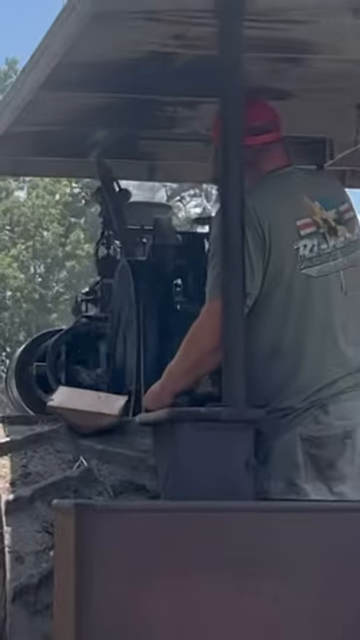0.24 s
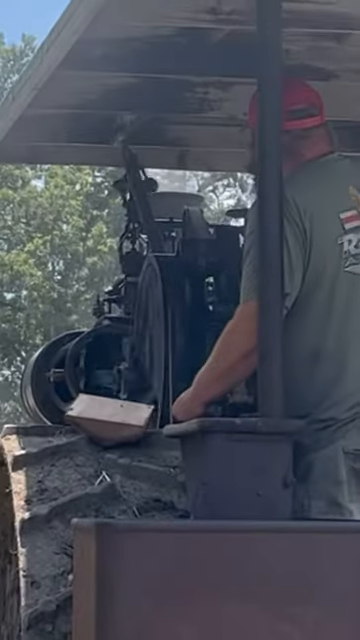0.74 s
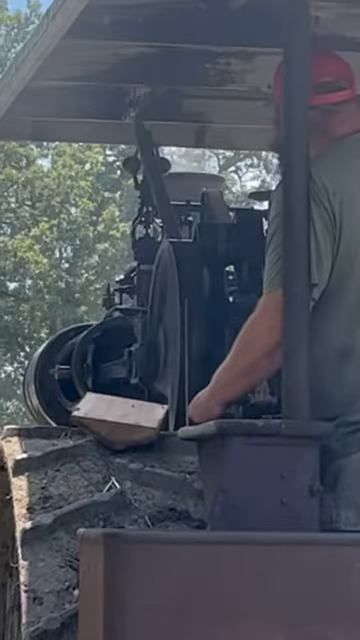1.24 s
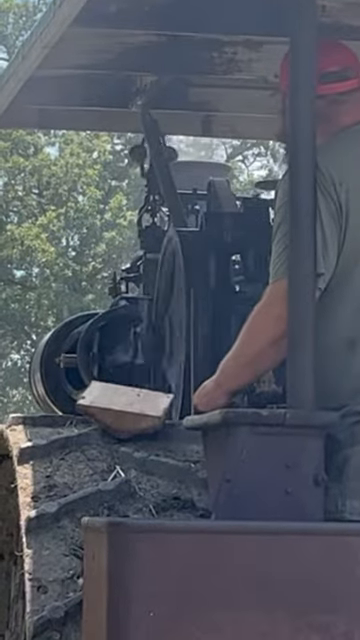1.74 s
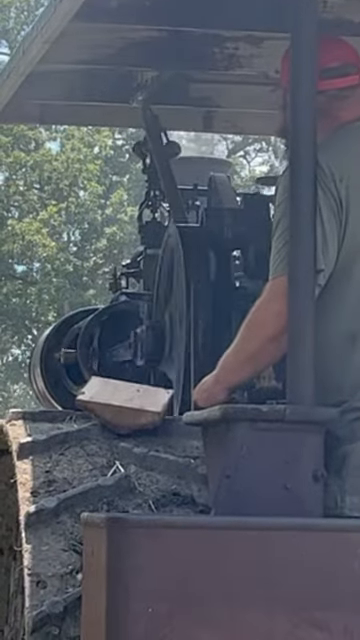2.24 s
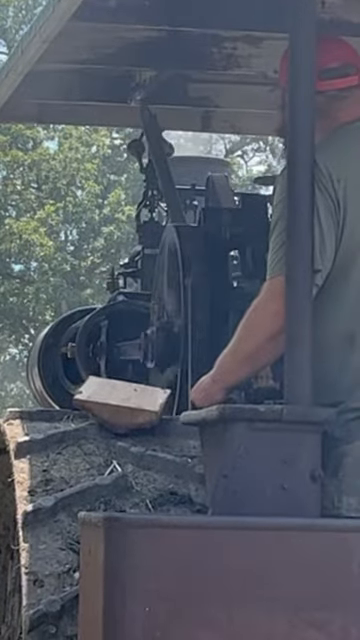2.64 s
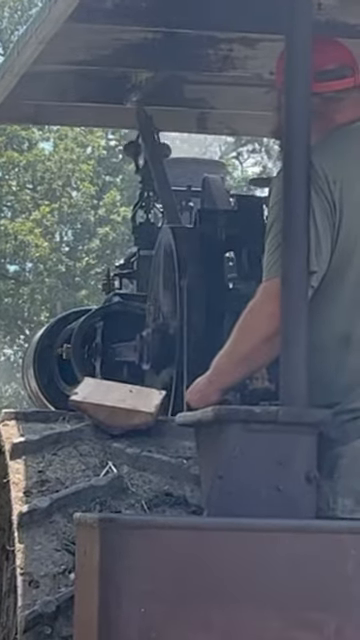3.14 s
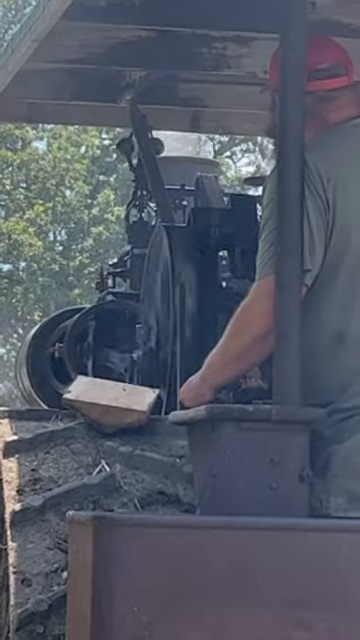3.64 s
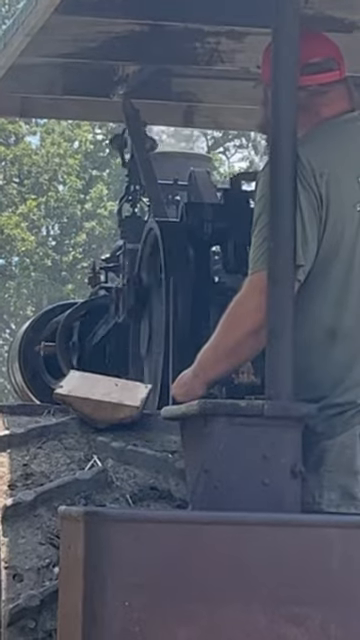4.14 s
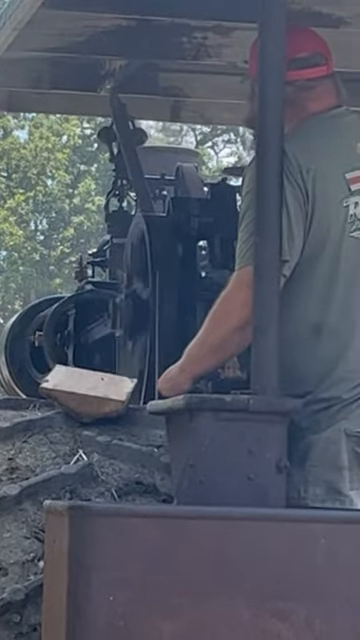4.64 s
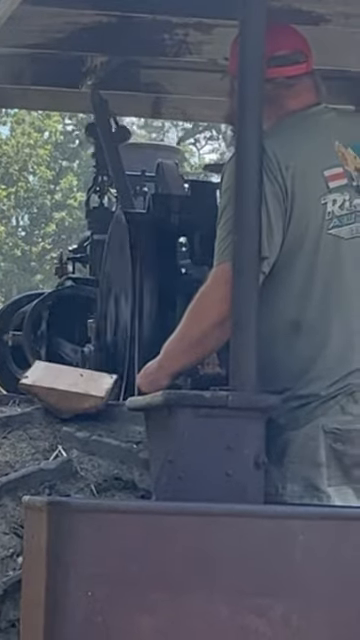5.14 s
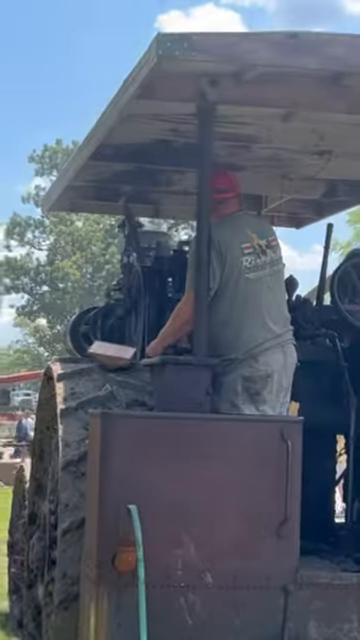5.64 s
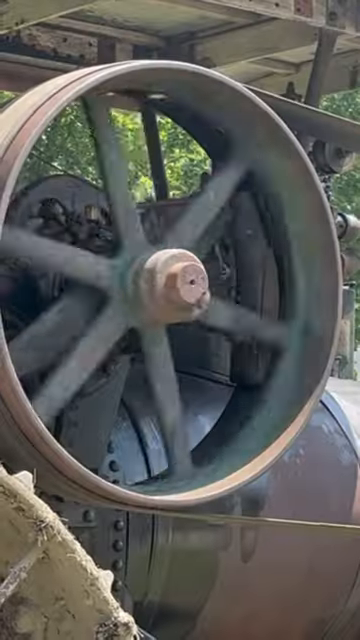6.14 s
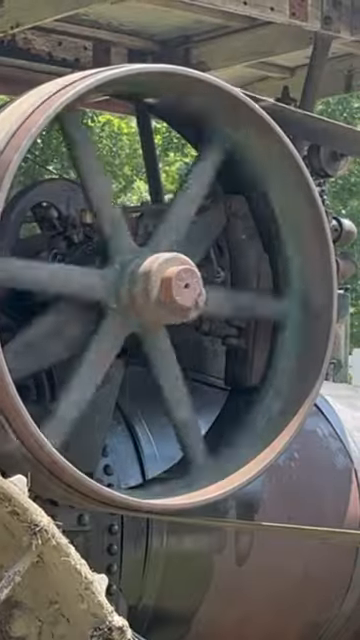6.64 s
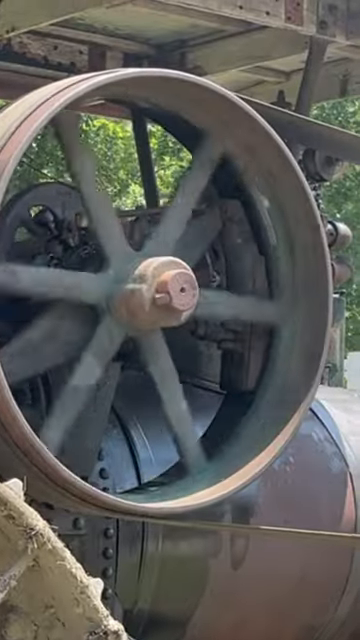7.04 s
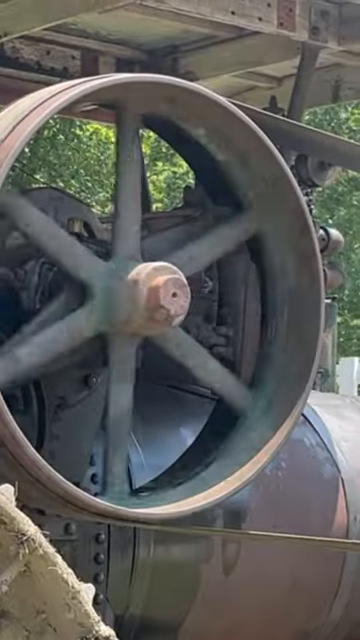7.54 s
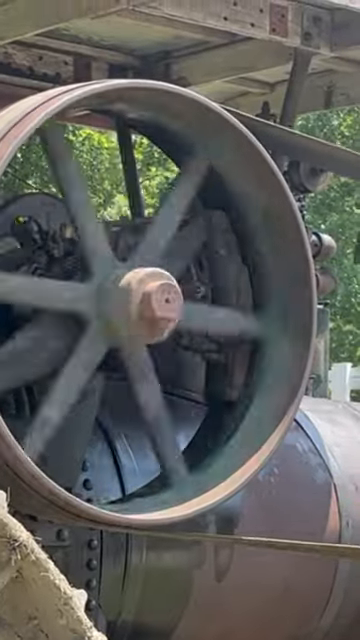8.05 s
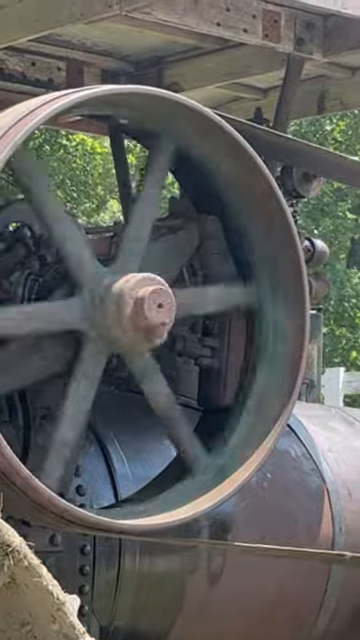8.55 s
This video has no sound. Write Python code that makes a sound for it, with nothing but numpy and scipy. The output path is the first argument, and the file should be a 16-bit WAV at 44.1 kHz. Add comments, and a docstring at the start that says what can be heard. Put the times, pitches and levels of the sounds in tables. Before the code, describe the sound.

Outdoors, behind the footplate of an old steam traction engine, hoarse hollow chuffs pound about eight times a second with deep thumps and stack hoots. Around four seconds the load drops: beats shrink to soft puffs over rumble, with valve ticks, bearing knocks and thin iron squeals. At six seconds an abrupt cut puts the microphone beside the flywheel, where louder, sharper chuffs spit steam to the end.

```python
"""A steam traction engine drives a sawmill by belt in the open air, two exhaust chuffs to each crank turn.
First, from behind the footplate, it works hard: noise jets, ringing stack tones and pitched hoots per beat.
From about 4 s it runs light: valve ticks, bearing knocks and ringing ironwork come through, as modal noise
and wavering tones. At 6.08 s the listener is abruptly beside the flywheel: loaded again, closer, sharper.
Gland leaks, rumble, fire boom and boiler hiss, all coloured noise, lie beneath."""
import sys
import numpy as np
from scipy import signal
from scipy.fft import rfft, irfft
from scipy.io import wavfile
from scipy.ndimage import uniform_filter1d

SR = 44100
rng = np.random.default_rng(int(sys.argv[2]) if len(sys.argv) > 2 else 0)


def to_wav(s):
    """Save 16-bit WAV."""
    ch = np.atleast_2d(s).T  # columns
    pcm = np.round(np.clip(ch, -1, 1) * 32767)  # PCM
    wavfile.write(sys.argv[1], SR, pcm.astype(np.int16))


N = 388080
TIME = np.arange(N) / SR
FREQS = np.fft.rfftfreq(N, 1 / SR)

MOVE_S = 6.083
WORKING_DB, LIGHT_DB = -8, -22  # blast when sawing (the other levels are given at it), and running light
LIGHT_RING_SHARE = 0.61  # the thump dies sooner when little steam follows it
BITE_HZ, BITE_OCTAVES = 1600, 1  # where a wetter, harder blast adds its bite
BARK_ALIKE = .4  # share of the power of the bark's grain that is the same on every beat
SIDE_TAIL_DB, SIDE_TAIL_S = -8, 0.045  # ragged steam trailing each beat beside the flywheel
TEETH_PER_TURN, CHATTER_DB = 8.1, 1  # the gears shake the ironwork
LOW_SING_HZ, HIGH_SING_HZ = 922, 1514  # clean tones of rubbing iron
SING_WAVER = .008  # rms share by which their pitch wanders
TICK_BOUNCE_S, TICK_BOUNCE_DB = .007, -13  # each tick snaps, then settles with a softer bounce
CUTOFF_HZ = 15700

# Exhaust beats, forward and back strokes in turn. Each row: start in seconds, blast in dB, deep thump in dB,
# stack note in dB, extra bite in dB, swell time as a multiple of the usual, throat pitch in Hz.
BEATS = [(0.043, -7.5, -20, -6.0, -2, 0.6, 835), (0.156, -12.5, -25, -11, -7, 1.0, 652),
         (0.286, -8.5, -25.5, -5, 0, 0.9, 694), (0.4, -15.5, -23, -6, 2.3, 1.1, 705),
         (0.531, -8, -21.0, -9.5, -1.5, 0.8, 833), (0.644, -12, -23.0, -17, -4, 0.7, 720),
         (0.775, -11, -23.0, -10.5, 0.5, 1.5, 620), (0.887, -14, -36.0, -10, -4, 1.1, 722),
         (1.017, -8.7, -22, -16, -0.5, 1.4, 650), (1.13, -13.7, -23.5, -12, -1, 1.1, 830),
         (1.26, -9.4, -20.5, -13, -3.5, 1.0, 704), (1.375, -13.5, -25.0, -16, -0.5, 0.7, 635),
         (1.505, -8.5, -24.5, -34, -1, 1.1, 730), (1.619, -12.5, -23, -13, -4, 0.6, 815),
         (1.754, -11, -21, -24, 2.5, 1.7, 625), (1.872, -10, -24.5, -8, -1.9, 0.8, 710),
         (2.005, -7.8, -29, -6, -2.5, 0.8, 735), (2.123, -10.5, -18, -14.0, -3, 1.0, 627),
         (2.259, -7, -26, -19, -0.8, 1.0, 856), (2.379, -10.5, -23, -8.5, 1, 1.0, 661),
         (2.517, -6, -23, -5.5, -1, 0.9, 694), (2.631, -7.5, -23, -6.5, 2.5, 1.8, 710),
         (2.768, -6, -23, -6.0, 3.5, 1.8, 780), (2.883, -8.5, -20.5, -10.0, -1, 1.3, 630),
         (3.017, -5.5, -29, -7, 0.5, 1.4, 793), (3.13, -9, -42, -14, 0, 0.8, 644),
         (3.263, -5, -27.5, -7, -0.5, 1.6, 728), (3.387, -6.5, -23, -14.0, -0.1, 0.7, 624),
         (3.506, -5, -29, -15, -2, 0.7, 770), (3.612, -11.5, -24.0, -13.0, 2.5, 1.8, 625),
         (3.733, -8, -40.0, -11.0, 0, 1.8, 648), (3.836, -12, -25, -15, -3, 0.6, 645),
         (3.954, -15, -22.0, -20, 2.5, 1, 720), (4.055, -25.5, -21.0, -26.0, 3, 1, 710),
         (4.167, -18.5, -25, -15.0, 5, 1, 730), (4.267, -33, -23.5, -23, 9, 1, 715),
         (4.381, -23, -32, -11.5, 5, 1, 720), (4.479, -24, -24.5, -30, 0, 1, 720),
         (4.594, -22, -32, -35, -6, 1, 720), (4.691, -25.5, -26.5, -38, 5, 1, 720),
         (4.805, -23.5, -33, -20.5, 2, 1, 720), (4.903, -37, -24.5, -25.5, 0, 1, 726),
         (5.02, -22.5, -25.0, -32.5, 7.5, 1, 720), (5.119, -34, -25, -26, 5, 1, 716),
         (5.231, -26.5, -24, -43, 12, 1, 722), (5.333, -31.6, -29.0, -34.0, 0, 1, 736),
         (5.451, -26, -31, -35.0, 9, 1, 706), (5.55, -35.4, -34, -44, 0, 1, 720),
         (5.664, -31, -29, -37, 3, 1, 726), (5.766, -29, -24.5, -33.0, 0, 1, 720),
         (5.882, -23, -25.5, -41, 4, 1, 720), (5.988, -42, -26.5, -34.0, 0, 1, 720),
         (6.084, -5.5, -17.5, -15, 2.5, 1.0, 715), (6.223, -4.5, -15.5, -11.5, 2, 1.0, 752),
         (6.339, -4.5, -18.0, -13, -1, 1.6, 767), (6.473, -3.0, -17, -19, 0, 1.4, 737),
         (6.586, -5.5, -19, -10, 0.9, 1.3, 740), (6.715, -3.5, -20.5, -35, -0.5, 0.6, 735),
         (6.828, -5.5, -19.5, -11.5, -0.5, 1.0, 696), (6.956, -5, -18.5, -34, 1, 0.8, 742),
         (7.067, -7.5, -17, -26, -0.1, 1.0, 695), (7.197, -4.5, -21, -31, 0.2, 0.7, 690),
         (7.306, -7.5, -18.0, -28, -2, 1.1, 810), (7.435, -4, -18.5, -12, -1, 0.7, 715),
         (7.545, -6.9, -18.5, -29, -4, 1.2, 775), (7.674, -5, -18, -23, -2.8, 0.7, 720),
         (7.786, -7, -22.5, -14, 0, 1.5, 715), (7.915, -6.0, -17.5, -31, -0.5, 1.2, 715),
         (8.027, -9.5, -18, -39, 0.5, 0.6, 676), (8.157, -4.9, -17, -23, -1.5, 0.6, 742),
         (8.27, -9, -17, -25, 0, 0.7, 700), (8.402, -5, -21, -16, -1, 0.9, 729),
         (8.516, -7, -20, -34, -1, 0.9, 750), (8.648, -5.5, -20.5, -21.5, -0.9, 1.2, 733),
         (8.764, -9, -19, -18, 2, 1.2, 670)]
# Jet spectra. Each row: frequency in Hz, relative level in dB.
REAR_JET_SPECTRUM = [(30, 6.5), (70, 5), (135, 1.5), (260, -2), (330, 9.5), (450, -5), (600, -1.5),
                     (820, -5.5), (1200, -12), (1420, -13), (2000, -15), (3000, -42), (6000, -35),
                     (15000, -43)]
SIDE_JET_SPECTRUM = [(30, 4.5), (80, 2), (145, -4), (260, 4), (480, -2.5), (600, -2), (950, -2),
                     (1400, -6.5), (1800, -11), (2600, -19.5), (5000, -23), (15000, -44)]
# Resonances of stack and canopy. Each row: frequency in Hz, width in Hz, relative power in dB.
REAR_STACK_MODES = [(197.3, 15.5, 2), (310, 19, -20), (375.2, 15, -1.5), (530, 57, -4.5), (632, 17, -10.5),
                    (715, 19, -8.5), (817, 21, -9.5), (1067, 39, -15), (1250, 65, -14.5),
                    (2130, 180, -23.5)]
SIDE_STACK_MODES = [(194, 12, -3.5), (306, 19, -8.5), (392, 27, -7.5), (488, 11, -8.5), (725, 43, -2.5),
                    (880, 30, -17), (980, 36, -9), (1200, 69, -12), (1376, 20, -12.5), (1496, 20, -11),
                    (1740, 40, -19), (2000, 91, -13)]
# Smokebox and stack air set swinging by the slug of steam. Each row: frequency in Hz, level in dB,
# 60 dB decay in seconds.
REAR_THUMP_MODES = [(62.7, 14, 0.16), (106, 3.5, 0.27)]
SIDE_THUMP_MODES = [(67.4, 11.4, 0.11), (89.6, 3.8, 0.073), (37, 1, 0.079)]
REAR_NOTE_MODES = [(180.9, -2.5, 0.38), (198.5, 8, 0.078)]
SIDE_NOTE_MODES = [(187, 1, 0.23)]
# Stack hum after each beat. Each row: frequency in Hz, width in Hz, relative power in dB.
HUM_MODES = [(173.8, 7.6, -2), (193.5, 3.8, -3), (373.2, 9.1, -9)]
# Short echoes off boiler, wheel and canopy. Each row: delay in seconds, level in dB.
REAR_ECHO_PATHS = [(.0032, -16.5), (.0056, -8), (.0195, -5)]
SIDE_ECHO_PATHS = [(.00405, -10.5), (.0123, -10)]
# Steam spray after the jet. Each row: frequency in Hz, relative level in dB.
SPRAY_SPECTRUM = [(1500, -1.5), (2600, -10), (4000, 4), (5800, -1), (8000, -6), (11000, -10), (15000, -35)]
# Ironwork resonances. Each row: frequency in Hz, width in Hz, relative power in dB.
LOW_RING_MODES = [(854, 14, 3.5), (910, 9.9, -2), (990, 70, 5.5)]
HIGH_RING_MODES = [(1534, 31, 4), (1970, 39, -9)]
# Valve gear ticks with the load off; the row at 4.587 s is the bright snap of the bearing knock there. # Each
# row: time in seconds, level in dB.
VALVE_TICKS = [(4.186, -43), (4.404, -45), (4.587, -44), (4.622, -37), (4.836, -38), (5.05, -39),
               (5.265, -39), (5.478, -39), (5.694, -35.5), (5.911, -35)]
# Bearing knocks at the stroke ends with the load off. Each row: time in seconds, level in dB.
BEARING_KNOCKS = [(4.276, -29), (4.586, -22.5), (5.017, -27.5), (5.235, -29), (5.449, -26.5), (5.66, -27),
                  (5.971, -35)]
# Resonances of valve gear and frame. Each row: frequency in Hz, width in Hz, relative power in dB.
VALVE_MODES = [(3400, 300, -10), (3740, 190, 12), (4430, 270, 10), (5100, 400, 16), (7400, 1500, -16),
               (12500, 2000, -52)]
FRAME_MODES = [(296, 26, 3), (467, 64, 0.5), (667, 90, -6), (1000, 130, 0.5), (1630, 130, -3.5),
               (1980, 88, -13)]
# Rubbing iron. Each row: middle in seconds, length in seconds, mean pitch in Hz, level in dB.
RUB_EVENTS = [(0.218, .08, 915, -30), (0.426, 0.061, 1530, -29), (4.287, .1, 1510, -40),
              (4.41, .1, 950, -35), (4.74, .11, 1490, -37), (4.75, .13, 870, -34), (4.76, .26, 933, -34),
              (5.025, 0.06, 1520, -44), (5.117, 0.092, 1535, -34.5), (5.28, .16, 1522, -39),
              (5.465, 0.12, 914, -31.5), (5.493, .08, 1522, -44), (5.842, 0.084, 1490, -42.5),
              (5.897, 0.13, 940, -37)]
# Gland leaks over time. Each row: time in seconds, level in dB.
REAR_GLAND_LEVELS = [(0, -33.5), (0.7, -35.5), (1.9, -34.5), (2.8, -33), (3.5, -34), (4, -43), (4.9, -46.5),
                     (6.07, -45)]
SIDE_GLAND_LEVELS = [(6.1, -26.5), (6.9, -27.5), (7.7, -30.5), (8.8, -30)]
# Background spectra. Each row: frequency in Hz, relative level in dB.
REAR_LEAK_SPECTRUM = [(600, 4), (1300, 4), (2100, 6), (2800, 4), (4200, 0), (5500, -3), (7000, -8),
                      (9000, -9.5), (12000, -17), (15500, -23)]
SIDE_LEAK_SPECTRUM = [(600, 7), (1300, 7.5), (2100, 2), (2800, -0.5), (4200, -1.5), (5800, -3), (7500, -10),
                      (10000, -14.5), (12000, -17), (15500, -19)]
RUMBLE_SPECTRUM = [(100, 7.5), (140, 0.5), (185, 8.5), (250, 0), (370, 2.5), (520, -7), (800, -6),
                   (1200, -9.5), (2500, -45)]
BOOM_SPECTRUM = [(20, -3), (35, 4), (58, 5.5), (90, 4.5), (140, -7), (300, -49)]
HISS_SPECTRUM = [(1000, 14), (2000, 13), (2800, -22), (4000, 0), (5500, -22), (7000, -21), (9000, -25),
                 (11500, -17), (13000, -21), (15500, -16)]
# Thin whistle of escaping steam. Each row: frequency in Hz, width in Hz, relative power in dB.
WHISTLE_MODES = [(13200, 350, 0)]
# How the engine reaches the listener. Each row: frequency in Hz, left minus right in dB,
# turns of phase by which left leads, diffuse sound in dB.
REAR_PATH = [(30, 1, 0.012, 0), (170, 3, -0.03, 4), (370, 3, -0.067, 2), (700, .5, -0.093, 1),
             (1250, -5, -0.04, 2), (1500, -2.5, 0.013, 3), (1900, -1, 0.035, 2), (2740, 2.5, 0.032, -15.5)]
SIDE_PATH = [(30, 0, .02, 0), (200, 3.5, 0.00095, 8), (480, 1, -0.064, 3), (600, 2.5, -0.1, -10),
             (1300, -4, -0.15, -8), (1650, 2, -0.12, 2.5), (2050, 4.5, -0.066, 1),
             (2510, -3.5, -0.067, 5.5), (2950, 4.5, 0, -7)]
# Treble end of both paths, alike left and right. One row, same columns.
TREBLE_PATH = (3600, 0, 0, 0)
# Stereo width of the noise. Each row: frequency in Hz, left-right likeness from 0 to 1.
STEREO_LIKENESS = [(60, 1), (300, .99), (800, .94), (1100, .82), (1400, .55), (1800, .45), (2400, .72),
                   (3000, .99), (3500, 1), (4700, 1), (5200, .82), (5700, 1), (7400, 1), (7800, .72),
                   (9200, .72), (9600, 1), (10200, 1), (10600, .62), (11500, .62), (11900, 1), (13000, 1),
                   (13400, .5), (14400, 1)]
# Stereo phase in the treble. Each row: frequency in Hz, turns of phase by which left leads.
STEREO_LEAD = [(4700, 0), (5180, -.08), (5600, -.5), (6650, -.5), (6800, -1), (7500, -1), (9500, -.5),
               (10300, -.5), (11800, 0), (13000, 0), (14100, .5)]


def from_footplate(beats):
    """Exhaust from behind: boiler and canopy shade the jet; the low stack note carries."""
    start_s, blast_db, thump_db, note_db = beats[:4]
    colour = spectrum(REAR_JET_SPECTRUM) * reflections(REAR_ECHO_PATHS)
    chuff = exhaust(beats, colour, REAR_STACK_MODES, jet_db=-11.0, lead_s=0.0077, rise_s=0.0062,
                    decay_s=0.036, stack_db=-10.5, stack_rise_s=0.01, stack_decay_s=0.044,
                    wash_db=-19.0, wash_decay_s=0.061, dull_hz=2000, rough_db=1.0)
    front = bark(beats, colour, level_db=-20.0, low_hz=400, lead_s=0.0033, rise_s=0.011, decay_s=0.037)
    lengths = np.interp(blast_db, [LIGHT_DB, WORKING_DB], [LIGHT_RING_SHARE, 1])
    thump = swings(start_s - .001, thump_db, REAR_THUMP_MODES, rise_s=0.0043, detune=0.09, lengths=lengths)
    note = swings(start_s - .004, note_db, REAR_NOTE_MODES, rise_s=0.015, detune=0.01)
    hum = noise(resonances(HUM_MODES)) * bursts(start_s, blast_db - 18.5, rise_s=0.008, decay_s=0.13)
    hoot = throat(beats, level_db=-17.0, rise_s=.008, decay_s=.028, waver=0.0508)
    return bite(chuff + front, beats) + hoot + thump + note + hum


def from_flywheel(beats):
    """Exhaust in plain view of the stack: the jet barks; bark and thump come back as echoes."""
    start_s, blast_db, thump_db, note_db = beats[:4]
    # more steam, more spray
    spray_db = np.interp(start_s, TIME, in_time(SIDE_GLAND_LEVELS)[0]) + 1.23 * blast_db
    echoes = reflections(SIDE_ECHO_PATHS)
    colour = spectrum(SIDE_JET_SPECTRUM) * echoes
    chuff = exhaust(beats, colour, SIDE_STACK_MODES, jet_db=-10.0, lead_s=0.0052, rise_s=0.0087,
                    decay_s=0.025, stack_db=-10.0, stack_rise_s=0.014, stack_decay_s=0.03,
                    wash_db=-16.5, wash_decay_s=0.037, dull_hz=2500, rough_db=1)
    front = bark(beats, colour, level_db=-18, low_hz=347, lead_s=.003, rise_s=0.0038, decay_s=0.029)
    spray_shape = bursts(start_s - .002, spray_db + 5.0, rise_s=0.01, decay_s=0.02)
    spray = noise(spectrum(SPRAY_SPECTRUM) * echoes) * spray_shape * flutter(120, 2.4)
    tail_shape = bursts(start_s + .02, spray_db + SIDE_TAIL_DB, rise_s=0.012, decay_s=SIDE_TAIL_S)
    tail = noise(spectrum(SPRAY_SPECTRUM)) * tail_shape * flutter(90, 3.5)
    thump = -swings(start_s - .001, thump_db, SIDE_THUMP_MODES, rise_s=0.0011, detune=0.035)
    thump_echo = from_db(-14.0) * np.interp(TIME - .044, TIME, thump)
    bark_echo = from_db(-13.5) * np.interp(TIME - .04, TIME, front)
    note = swings(start_s, note_db, SIDE_NOTE_MODES, rise_s=0.012, detune=0.013)
    hum = noise(resonances(HUM_MODES)) * bursts(start_s, blast_db - 21.0, rise_s=0.02, decay_s=0.088)
    hoot = throat(beats, level_db=-12, rise_s=0.0062, decay_s=0.033, waver=0.0498)
    steam = bite(chuff + front + bark_echo, beats) + hoot + spray + tail
    return steam + thump + thump_echo + note + hum


def exhaust(beats, colour, stack, jet_db, lead_s, rise_s, decay_s, stack_db, stack_rise_s, stack_decay_s,
            wash_db, wash_decay_s, dull_hz, rough_db):
    """A ragged jet swells as the port opens, blows the stack, and leaves a duller wash from around."""
    start_s, blast_db, swell = beats[[0, 1, 5]]
    start_s = start_s - lead_s
    jet_shape = bursts(start_s, blast_db + jet_db, rise_s * swell, decay_s)
    jet = noise(colour) * jet_shape * flutter(190, rough_db)
    pipe_shape = bursts(start_s, blast_db + stack_db, stack_rise_s * swell, stack_decay_s)
    pipe = noise(resonances(stack)) * pipe_shape
    dull_colour = colour / np.hypot(1, FREQS / dull_hz)
    wash = noise(dull_colour) * bursts(start_s, blast_db + wash_db, 0.039, wash_decay_s)
    return jet + pipe + wash


def bark(beats, colour, level_db, low_hz, lead_s, rise_s, decay_s):
    """Steep slug fronts scatter off the same ironwork, so the beats share part of their coarse grain."""
    start_s, blast_db, swell = beats[[0, 1, 5]]
    start_s = start_s - lead_s
    thinned = colour * FREQS ** 2 / (FREQS ** 2 + low_hz ** 2)
    fresh, shared = noise(thinned)[0], noise(thinned)[0]
    grain = shared * bursts([0], [level_db], rise_s, decay_s)
    repeated = np.zeros(N)
    for s, db in zip(start_s, blast_db):
        add(repeated, s, from_db(db) * grain[:SR // 2])
    varied = fresh * bursts(start_s, blast_db + level_db, rise_s * swell, decay_s)
    return np.sqrt(BARK_ALIKE) * repeated + np.sqrt(1 - BARK_ALIKE) * varied


def bite(x, beats):
    """Some blasts are harder in the upper middle, others duller."""
    band = np.exp(-(np.log2((FREQS + 1) / BITE_HZ) / BITE_OCTAVES) ** 2)
    extra = from_db(per_beat(beats, beats[4])) - 1
    return x + extra * irfft(rfft(x) * band, N)


def throat(beats, level_db, rise_s, decay_s, waver):
    """A hoarse narrow tone under each beat, its pitch set per beat by the table and wavering at random."""
    hz = per_beat(beats, beats[6]) * (1 + waver * wander(109.4))
    tone = np.sin(2 * np.pi * np.cumsum(hz) / SR)
    return tone * bursts(beats[0], beats[1] + level_db, rise_s, decay_s) * rms_one(flutter(120, 3.7))


def swings(times, levels_db, modes, rise_s, detune, lengths=1):
    """Each beat rings the air column as decaying sines, each a little off pitch at random."""
    t, out = TIME[:SR // 2], np.zeros(N)
    lengths = lengths * np.ones(len(times))
    chances = rng.standard_normal((len(times), len(modes)))
    for s, db, length, chance in zip(times, levels_db, lengths, chances):
        ring = 0
        for (hz, mode_db, t60_s), c in zip(modes, chance):
            decay = from_db(mode_db - 60 * t / (t60_s * length))
            ring = ring + decay * np.sin(2 * np.pi * hz * (1 + detune * c) * t)
        add(out, s, from_db(db) * ring * (1 - np.exp(-(t / rise_s) ** 2)))
    return out


def clatter():
    """The valve gear snaps, bounces and jogs the frame; slack bearings knock on it."""
    tick_s, tick_db = np.transpose(VALVE_TICKS)
    snaps = bursts(tick_s, tick_db, rise_s=0.001, decay_s=0.0062)
    bounces = bursts(tick_s + TICK_BOUNCE_S, tick_db + TICK_BOUNCE_DB, rise_s=.001, decay_s=0.009)
    jogs = bursts(tick_s, tick_db + 1.0, rise_s=.002, decay_s=0.011)
    knocks = bursts(*np.transpose(BEARING_KNOCKS), rise_s=0.00055, decay_s=0.018)
    gear = noise(resonances(VALVE_MODES)) * (snaps + bounces)
    return gear + noise(resonances(FRAME_MODES)) * (jogs + knocks)


def ironwork(beats, low_db, high_db, sing_db, ring_per_blast, steady_db, decay_s):
    """The gears keep the iron ringing; it swells with every stroke, and a thin tone sings in it."""
    ring_db = ring_per_blast * (beats[1] - WORKING_DB)
    shaken = from_db(steady_db) + bursts(beats[0], ring_db, rise_s=0.0071, decay_s=decay_s)
    chatter = from_db(CHATTER_DB * np.cos(2 * np.pi * TEETH_PER_TURN * crank(beats)))
    low = rms_one(noise(resonances(LOW_RING_MODES)) + from_db(sing_db) * sing(LOW_SING_HZ))
    high = rms_one(noise(resonances(HIGH_RING_MODES)) + from_db(sing_db) * sing(HIGH_SING_HZ))
    return (from_db(low_db) * low + from_db(high_db) * high) * shaken * chatter * flutter(10.5, 2.7)


def sing(hz):
    """A thin tone of wavering pitch and level, rms 1."""
    phase = 2 * np.pi * np.cumsum(hz * (1 + SING_WAVER * wander(14.43))) / SR
    return rms_one(np.sin(phase) * flutter(6.6, 2.8))


def squeals(waver, rough_db):
    """Where parts rub, a narrow, broken tone swells and fades."""
    out, clock_s = np.zeros(N), np.cumsum(1 + waver * wander(35)) / SR
    for s, length_s, hz, db in RUB_EVENTS:
        on = abs(TIME - s) < length_s / 2
        swell = np.cos(np.pi * (TIME[on] - s) / length_s)
        out[on] += from_db(db) * swell * np.sin(2 * np.pi * hz * clock_s[on])
    return out * rms_one(flutter(45, rough_db))


def machinery(glands, beats, leak_spectrum, leak_db, rumble_db, rumble_per_effort, boom_db, boom_per_effort,
              stroke_db):
    """Glands leak, by stroke where stroke_db is set; belt-and-gear rumble and fire boom grow with effort."""
    # blast averaged over two beats, a whole turn
    load_db = np.interp(TIME, beats[0], uniform_filter1d(beats[1], size=2)) - WORKING_DB
    pressure_db = stroke_db * np.cos(2 * np.pi * (crank(beats) - .35))
    leak_gain = from_db(in_time(glands)[0] + leak_db + pressure_db)
    leak = leak_gain * noise(spectrum(leak_spectrum)) * flutter(20, 0.9)
    rumble_gain = from_db(rumble_db + rumble_per_effort * load_db)
    rumble = rumble_gain * noise(spectrum(RUMBLE_SPECTRUM)) * flutter(29, 2.06)
    boom = from_db(boom_db + boom_per_effort * load_db) * noise(spectrum(BOOM_SPECTRUM))
    return leak + rumble + boom


def boiler_hiss():
    """Steady coloured noise of the boiler, with a thin whistle of escaping steam."""
    hiss = from_db(-47.0) * noise(spectrum(HISS_SPECTRUM))
    return hiss + from_db(-67) * noise(resonances(WHISTLE_MODES))


def from_db(db):
    """Decibels to gain."""
    return 10 ** (np.asarray(db) / 20)


def rms_one(x):
    """Scale to rms 1."""
    return x / np.sqrt(np.mean(x ** 2) + 1e-20)


def in_time(rows):
    """The columns of a curve at every sample."""
    s, *columns = np.transpose(rows)
    return [np.interp(TIME, s, c) for c in columns]


def over_hz(points):
    """A table joined by straight lines on a log-frequency axis."""
    hz, value = np.transpose(points)
    return np.interp(np.log(FREQS + 1), np.log(hz), value)


def spectrum(points):
    """Gain over frequency from a table in dB."""
    return from_db(over_hz(points))


def resonances(modes):
    """Gain over frequency of resonances side by side; dB is the power in each."""
    power = 0
    for hz, width_hz, db in modes:
        offset = (FREQS ** 2 - hz ** 2) / (width_hz * (FREQS + 1))
        power = power + from_db(db) ** 2 / width_hz / (1 + offset ** 2)
    return np.sqrt(power)


def reflections(paths):
    """Colour that short echoes give to a sound: magnitude only, no delay."""
    return abs(1 + sum(from_db(db) * np.exp(-2j * np.pi * FREQS * delay_s) for delay_s, db in paths))


def noise(gain):
    """Stereo noise of a given colour, rms 1, as alike left and right as the table sets."""
    mid, side = rfft(rng.standard_normal((2, N)))
    alike = np.clip(over_hz(STEREO_LIKENESS), 0, 1)
    pair = np.sqrt(1 + alike) * mid + np.sqrt(1 - alike) * side * [[1], [-1]]
    return rms_one(irfft(gain * pair, N))


def wander(rate_hz):
    """Slow chance, rms 1."""
    return rms_one(irfft(rfft(rng.standard_normal(N)) / (1 + (FREQS / rate_hz) ** 2), N))


def flutter(rate_hz, depth_db):
    """A gain that wanders at random."""
    return from_db(depth_db * wander(rate_hz))


def add(out, s, sound):
    """Mix a sound in at a time."""
    start = max(round(s * SR), 0)
    out[start:start + len(sound)] += sound[:N - start]


def bursts(times, levels_db, rise_s, decay_s):
    """Pressure that builds as a port opens and then drains away, peak at the given level."""
    t, out = TIME[:SR // 2], np.zeros(N)
    for s, db, opening_s in zip(times, levels_db, rise_s * np.ones(len(times))):
        shape = (1 - np.exp(-(t / opening_s) ** 2)) * np.exp(-t / decay_s)
        add(out, s, from_db(db) * shape / shape.max())
    return out


def per_beat(beats, values):
    """Hold each beat's value from just before it until the next."""
    return values[np.maximum(np.searchsorted(beats[0] - .012, TIME) - 1, 0)]


def crank(beats):
    """Turns of the crank so far, two beats to a turn."""
    return np.interp(TIME, beats[0], np.arange(len(beats[0])) / 2)


def steer(x, balance_db, turns):
    """Set level and phase between left and right, over frequency."""
    sides = np.array([[1], [-1]]) / 2
    return irfft(rfft(x) * from_db(sides * balance_db) * np.exp(2j * np.pi * sides * turns), N)


def arriving(x, path):
    """A sound as it reaches left and right, from its direction and from all around."""
    hz, *columns = np.transpose([*path, TREBLE_PATH])
    balance_db, turns, diffuse_db = (over_hz(np.c_[hz, c]) for c in columns)
    direct = x.mean(axis=0)
    diffuse = irfft(rfft(x - direct) * from_db(diffuse_db), N)
    return steer(direct + diffuse, balance_db, turns)


def behind():
    """All engine sound at the footplate but the boiler hiss."""
    beats = np.transpose([row for row in BEATS if row[0] < MOVE_S - .05])
    bed = machinery(REAR_GLAND_LEVELS, beats, REAR_LEAK_SPECTRUM, leak_db=1.0, rumble_db=-28.0,
                    rumble_per_effort=0.15, boom_db=-31.5, boom_per_effort=0.074, stroke_db=0.45)
    iron = ironwork(beats, low_db=-42.5, high_db=-45.0, sing_db=-4, ring_per_blast=0.75,
                    steady_db=-1.5, decay_s=0.069)
    rubbing = squeals(waver=.009, rough_db=2.5)
    return arriving(from_footplate(beats) + bed + iron + rubbing + clatter(), REAR_PATH)


def beside():
    """All engine sound at the flywheel but the boiler hiss."""
    beats = np.transpose([row for row in BEATS if row[0] > MOVE_S - .05])
    bed = machinery(SIDE_GLAND_LEVELS, beats, SIDE_LEAK_SPECTRUM, leak_db=-2.6, rumble_db=-27.5,
                    rumble_per_effort=0.64, boom_db=-48.0, boom_per_effort=0.86, stroke_db=0.0)
    iron = ironwork(beats, low_db=-43, high_db=-43.5, sing_db=2.5, ring_per_blast=0.9,
                    steady_db=0.5, decay_s=0.076)
    return arriving(from_flywheel(beats) + bed + iron, SIDE_PATH)


def scene():
    """The engine from behind, then abruptly from the side, over steady hiss."""
    return np.where(TIME < MOVE_S, behind(), beside()) + boiler_hiss()


def record(dry):
    """Left and right differ in phase in the treble; the deep bass and the top are cut."""
    pair = steer(dry, 0, np.interp(FREQS, *np.transpose(STEREO_LEAD)))
    pair = signal.sosfilt(signal.butter(6, 33, "high", fs=SR, output="sos"), pair)
    pair = 1.178 * np.tanh(pair / 1.084)  # the loudest peaks are rounded
    return signal.sosfilt(signal.ellip(12, .1, 90, CUTOFF_HZ, fs=SR, output="sos"), pair)


dry = scene()
out = record(dry)
to_wav(out)
```